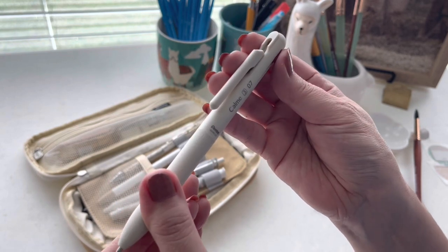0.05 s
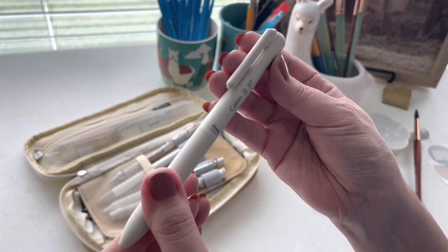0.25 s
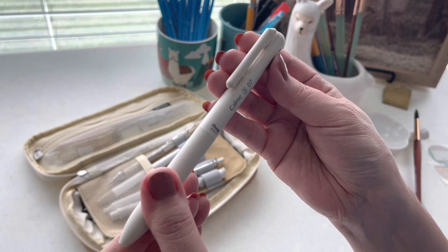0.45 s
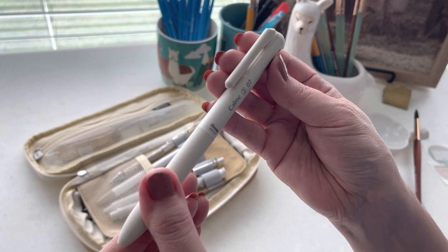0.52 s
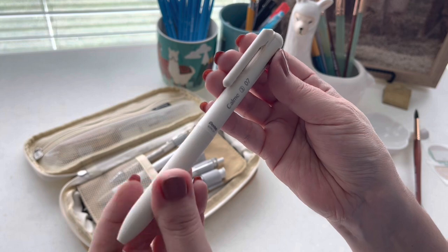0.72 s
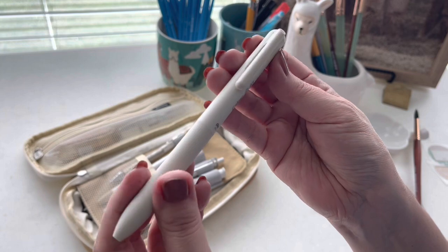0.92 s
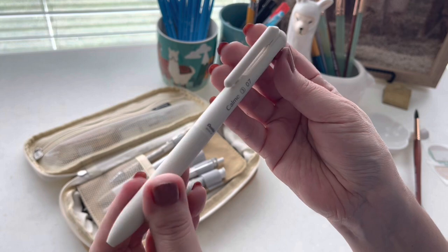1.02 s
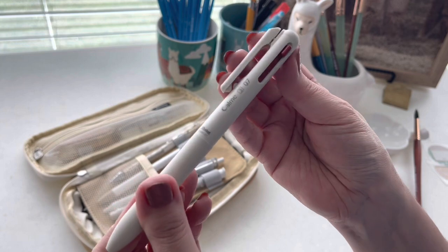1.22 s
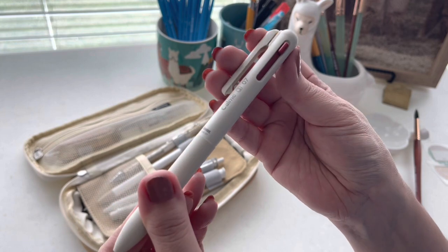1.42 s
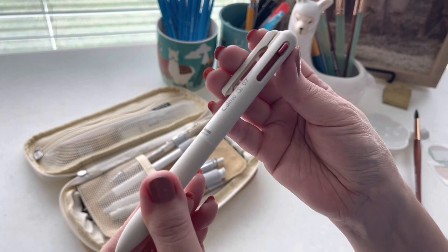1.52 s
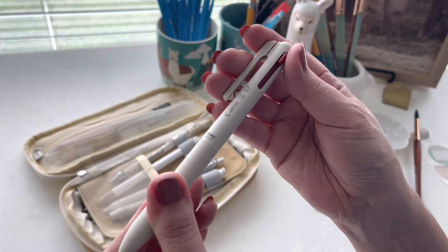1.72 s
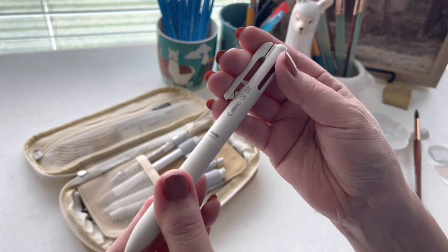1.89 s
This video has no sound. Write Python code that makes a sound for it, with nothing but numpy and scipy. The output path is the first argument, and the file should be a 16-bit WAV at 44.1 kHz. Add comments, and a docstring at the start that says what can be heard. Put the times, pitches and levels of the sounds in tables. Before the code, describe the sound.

One multi-colour pen slider snaps crisply in a quiet room, followed by barely audible rubs and ticks.

```python
"""A slider scrapes along its slot in a multi-colour plastic pen and snaps home, close to a phone in a quiet room;
smaller ticks and fingertip rubs follow as the pen is turned. Contacts are bursts of micro-impacts and slides are
grainy friction noise, both shaped by the resonances of pen and microphone; the snap also knocks the whole pen.
The room answers with decaying noise; an appliance hums in wavering sine lines over a faint shaped-noise hiss."""
import sys
import numpy as np
from scipy import signal
from scipy.fft import rfft, irfft, next_fast_len
from scipy.io import wavfile
from scipy.ndimage import uniform_filter1d, map_coordinates

SR = 44100
rng = np.random.default_rng(int(sys.argv[2]) if len(sys.argv) > 2 else 0)


def amplitude_ratio(level_db):
    """Convert a level in decibels to the matching linear amplitude (field) ratio."""
    exponent = np.asarray(level_db, float) / 20
    return 10 ** exponent


def dump_mix(stems):
    """Bounce the given channels to the path in sys.argv[1] as a 16-bit WAV at rate SR."""
    frames = np.atleast_2d(stems).T  # one column per channel
    limited = np.clip(frames, -1, 1)  # hard clip at full scale
    pcm = np.round(limited * 32767).astype(np.int16)
    wavfile.write(sys.argv[1], SR, pcm)


N = 85995  # length in samples

# Slider contacts and light ticks: t/s, peak level/dB, contact length/s, brightness/(dB per octave),
# favoured f/Hz, its lift/dB
CONTACTS = [(.0752, -54, .001, 3, 11500, 3), (.0799, -35, .0011, 5, 4650, 15),
            (.0815, -43, .0005, 2, 1950, 12), (.2388, -32, .001, 0, 5000, 3),
            (.2462, -24, .0015, 3, 11500, 4), (.2509, -12, .0009, 1, 8000, 2),
            (.2514, -7, .0012, 0, 11500, 6), (.2545, -24, .0015, 0, 2400, 0),
            (.2578, -32, .001, 1, 9000, 3), (.2618, -36, .0015, 1, 6000, 6), (.565, -68, .002, 3, 8500, 3),
            (.673, -63, .004, -2, 2200, 3), (.755, -66, .002, 1, 8500, 3), (.7773, -46, .002, 0, 5300, 10),
            (.957, -61, .002, -2, 2800, 4), (1.2415, -59, .002, -1, 3700, 10),
            (1.452, -62, .001, 1, 12000, 3), (1.8507, -47, .002, -2, 5100, 10),
            (1.937, -57, .003, 0, 3600, 8)]
# Slides of plastic or skin: start t/s, rise/s, hold/s, fall/s, level/dB, brightness/(dB per octave),
# favoured f/Hz, its lift/dB
SLIDES = [(.073, .003, .007, .012, -63, 3, 4650, 6), (.2325, .013, .004, .004, -30, 3, 11500, 3),
          (.2522, .001, .002, .016, -30, 1, 6000, 4), (.56, .01, .02, .03, -78, 4, 8500, 3),
          (.665, .006, .01, .03, -76, -2, 2200, 4), (.745, .02, .02, .03, -68, 3, 5100, 8),
          (.93, .02, .02, .02, -74, 0, 2800, 4), (1.06, .03, .03, .04, -80, 4, 8500, 3),
          (1.565, .02, .055, .02, -70, 6, 8200, 4), (1.81, .008, .045, .02, -66, 4, 5000, 8),
          (1.928, .008, .02, .01, -63, 2, 3600, 9)]
# The slider's blow on the whole pen: t/s, peak level/dB, push time constant/s
KNOCK = (.2519, -24, 0.00026)
# Modes of the whole pen: f/Hz, width/Hz, relative level/dB
KNOCK_MODES = [(166.67, 41, -15.5), (600, 430, -5.5), (1087, 330, 6)]
# Resonances of the pen as the phone's microphone hears it: f/Hz, width/Hz, level/dB
PEN_AND_MIC_MODES = [(2360, 430, -4.5), (3380, 400, -8), (5130, 1000, -10), (6127, 600, -9),
                     (7280, 1000, -9.5), (8680, 500, -3), (11356, 810, -7), (15300, 1000, -14.5)]
# Phase by which the left port leads the right: f/Hz, phase/rad
PORT_PHASE = [(0, 0), (500, .55), (1500, .55), (2400, 1.1), (5000, 1), (7600, 1.2), (10600, -3.4),
              (12300, -7.6), (16200, -13)]
# Level of the left port over the right: f/Hz, level/dB
PORT_BALANCE = [(200, 2), (700, 5), (1400, 2.5), (2400, 1.5), (5000, 3), (9000, 0), (14000, 2.5)]
# Span around the big snap, where left and right differ most: start t/s, end t/s
SNAP_SPAN = (.2, .4)
# Reverberation time of the room: f/Hz, t60/s
ROOM_T60 = [(300, .15), (1200, .22), (2400, 0.24), (4200, .24), (5900, 0.22), (7000, 0.19), (11000, 0.22),
            (15000, .12)]
# Colour of the room's answer: f/Hz, relative level/dB
ROOM_COLOUR = [(200, 4.5), (800, 0), (1600, 1.5), (2500, -3), (3400, 6), (4400, -3.5), (5300, -4.5),
               (5900, 3), (6600, 2.5), (7800, 1), (9000, -3), (10200, -11.5), (11500, 1), (12800, -5.5),
               (13500, -22), (15000, -5)]
# Appliance hum lines: f/Hz, level/dB before the swell
HUM_LINES = [(50, -85), (75, -81), (100.5, -66.5), (125, -83), (200, -80.5), (301, -82)]
# Swell of the hum, used relative to the mean of these points: t/s, level/dB
HUM_SWELL = [(0.0, -64), (0.102, -64), (0.26, -74), (0.298, -65.5), (0.944, -64.5), (1.048, -68.5),
             (1.232, -64), (1.95, -70.5)]
# Spectrum of the hiss: f/Hz, relative level/(dB per Hz)
HISS_SPECTRUM = [(21, -41), (35, -12), (75, 0.5), (112, -7), (179, -8.5), (325, -15.5), (495, -21.5),
                 (683, -24), (990, -28.5), (3590, -37.5), (8750, -36), (9420, -38.5), (10100, -45),
                 (11500, -30), (13000, -47.5)]
# Left-right correlation of the hiss: f/Hz, correlation (no unit)
HISS_LIKENESS = [(30, .93), (180, .9), (550, .6), (1650, .4), (5000, .4), (13000, .1)]

CHATTER = .35  # micro-impacts after the first touch, relative to it
GRAIN_RATE_HZ, GRAIN_DB = 700, 3  # roughness of a slide: changes per second, depth
SLIDE_TOP_HZ = 13200
BROAD_DB = -24  # response between the resonances
PIVOT_HZ = 5000  # brightness slopes about this frequency
FAVOUR_WIDTH = .16  # width of the favoured region over its centre
FACING_SHARE = .081  # share of the port differences outside the snap span
ROOM_DB, ROOM_DELAY_S, ROOM_BUILD_S = -17, .006, .02
WAVER_RATE_HZ, WAVER_DB, WAVER_RADIANS = 10, -1, .5
HISS_DB, PATCHY_DB, HISS_TOP_HZ = -66, 1.5, 13050


def contacts():
    """Impact excitation: bursts of micro-impacts excite the resonances; the hard stop also knocks the whole pen."""
    out = np.zeros(N)
    t = np.arange(2048) / SR
    for start, db, length, *colour in CONTACTS:
        u = 4 * t / length
        first_touch = t == 0
        chatter = CHATTER * u * np.exp(1 - u) * rng.standard_normal(len(t))
        hit = pen_and_mic(first_touch + chatter, *colour)
        add(out, start, amplitude_ratio(db) * hit / np.abs(hit).max())
    start, db, length = KNOCK
    push = t / length * np.exp(-t / length)
    knock = filtered(push, lambda f: resonances(KNOCK_MODES, f))
    add(out, start, amplitude_ratio(db) * knock / np.abs(knock).max())
    return out


def slides():
    """Friction excitation: noise of fluctuating roughness excites the resonances under a rise-hold-fall stroke."""
    out = np.zeros(N)
    t = np.arange(SR // 4) / SR
    for start, rise, hold, fall, db, *colour in SLIDES:
        grain = map_coordinates(rng.standard_normal(SR // 2), [t * GRAIN_RATE_HZ])
        friction = rng.standard_normal(len(t)) * amplitude_ratio(GRAIN_DB * grain)
        rub = unit(pen_and_mic(friction, *colour))
        remaining = rise + hold + fall - t
        stroke = np.clip(np.minimum(t / rise, remaining / fall), 0, 1) ** 2
        add(out, start, amplitude_ratio(db) * stroke * rub)
    return filtered(out, lambda f: 1 / (1 + (f / SLIDE_TOP_HZ) ** 20))


def pen_and_mic(x, brightness_db, favoured_hz, lift_db):
    """Modal resonance of pen and microphone; each touch has its own brightness and favours one region."""
    def response(f):
        broad = amplitude_ratio(BROAD_DB) * 1j * f / (1200 + 1j * f)
        region = resonances([(favoured_hz, FAVOUR_WIDTH * favoured_hz, 0)], f)
        favour = 1 + (amplitude_ratio(lift_db) - 1) * region
        brightness = amplitude_ratio(brightness_db * np.log2((f + 100) / PIVOT_HZ))
        return (resonances(PEN_AND_MIC_MODES, f) + broad) * favour * brightness
    return filtered(x, response)


def resonances(modes, f):
    """Modal superposition: causal second-order resonances summed with alternating sign."""
    total = 0
    for k, (centre, width, db) in enumerate(modes):
        mode = 1j * f * width / (centre ** 2 - f ** 2 + 1j * f * width)
        total = total + (-1) ** k * amplitude_ratio(db) * mode
    return total


def ports(x, share):
    """Interchannel differences: two microphone ports hear the pen with unlike phase and level."""
    side = share * np.array([[.5], [-.5]])  # left, right

    def response(f):
        phase = np.interp(f, *np.transpose(PORT_PHASE))
        return amplitude_ratio(side * along(PORT_BALANCE, f)) * np.exp(1j * side * phase)
    return filtered(x, response)


def room(x):
    """Reverberation: reflections build up, then each frequency decays exponentially at its own rate."""
    f, t, z = signal.stft(rng.standard_normal((2, SR // 2)), SR, nperseg=256)
    decay_db = 60 * t / along(ROOM_T60, f)[:, None]
    build = 1 - np.exp(-t / ROOM_BUILD_S)
    shape = amplitude_ratio(along(ROOM_COLOUR, f)[:, None] - decay_db) * build
    tail = signal.istft(z * shape, SR, nperseg=256)[1]
    tail = tail / np.linalg.norm(tail[0])
    late = np.pad(x, (round(ROOM_DELAY_S * SR), 0))[None]
    return amplitude_ratio(ROOM_DB) * signal.fftconvolve(late, tail, axes=1)[:, :N]


def hum():
    """Additive synthesis: an appliance's tonal lines waver in level and phase and swell together."""
    t = np.arange(N) / SR

    def waver():
        return map_coordinates(rng.standard_normal(SR // 100), [t * WAVER_RATE_HZ])
    lines = 0
    for f, db in HUM_LINES:
        level = amplitude_ratio(db + WAVER_DB * waver())
        phase = 2 * np.pi * (f * t + rng.random())
        lines = lines + level * np.sin(phase + WAVER_RADIANS * waver())
    s, swell_db = np.transpose(HUM_SWELL)
    swell = np.interp(t, s, swell_db - swell_db.mean())
    balance = np.array([[.5], [-.5]])  # dB, left and right
    return np.sqrt(2) * lines * amplitude_ratio(swell + balance)


def hiss():
    """Subtractive synthesis: the room's broad hiss is noise shaped in frequency and cut off at the top."""
    noise = pair(lambda f: amplitude_ratio(along(HISS_SPECTRUM, f)) * (f < HISS_TOP_HZ))
    return amplitude_ratio(HISS_DB) * noise


def pair(gain):
    """Partial coherence: faintly patchy stereo noise of rms 1, more alike in the bass."""
    z = signal.stft(rng.standard_normal((2, N)), nperseg=512)[2]
    patches = rng.standard_normal(z.shape[1:])
    patches = uniform_filter1d(uniform_filter1d(patches, 6, 0), 14, 1)
    two = signal.istft(z * amplitude_ratio(PATCHY_DB * unit(patches)), nperseg=512)[1][:, :N]

    def response(f):
        angle = np.arccos(np.clip(along(HISS_LIKENESS, f), -1, 1)) / 2
        return gain(f) * np.array([np.cos(angle), np.sin(angle)])
    mid, side = filtered(two, response)
    return unit(np.array([mid + side, mid - side]))


def unit(x):
    """Energy normalisation to rms 1."""
    return x / np.sqrt(np.mean(x ** 2) + 1e-20)


def along(points, f):
    """Interpolation of (f/Hz, value) points on a logarithmic frequency axis."""
    point_hz, value = np.transpose(points)
    return np.interp(np.log(f + 1), np.log(point_hz + 1), value)


def filtered(x, response):
    """Linear filtering: the spectrum times a complex response of frequency."""
    n = x.shape[-1]
    m = next_fast_len(n + 8192)  # room for the ringing
    return irfft(rfft(x, m) * response(np.fft.rfftfreq(m, 1 / SR)), m)[..., :n]


def add(track, start, sound):
    """Superposition of a sound onto the track at start seconds."""
    part = track[round(start * SR):][:len(sound)]
    part += sound[:len(part)]


def scene():
    """Superposition of the direct pen sound, its reverberation and the background."""
    pen = contacts() + slides()
    t = np.arange(N) / SR
    in_snap = (t > SNAP_SPAN[0]) & (t < SNAP_SPAN[1])
    direct = ports(pen * in_snap, 1) + ports(pen * ~in_snap, FACING_SHARE)
    return direct + room(pen) + hum() + hiss()


def band_limit(x):
    """A steep low-pass at the top of the band."""
    return signal.sosfilt(signal.butter(12, 16590, fs=SR, output="sos"), x)


def record(dry):
    """Signal chain: the finished mix as the phone stores it."""
    return band_limit(dry)


dry = scene()
out = record(dry)
dump_mix(out)
```